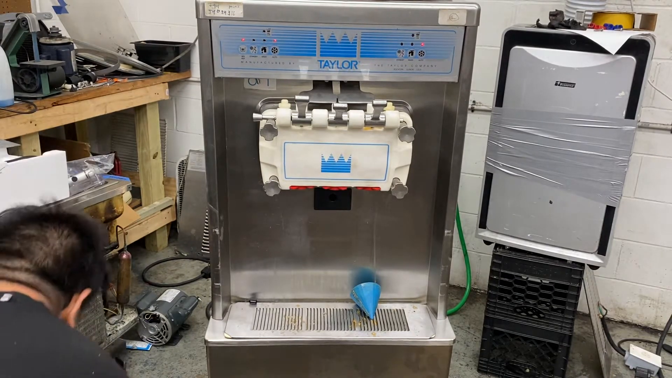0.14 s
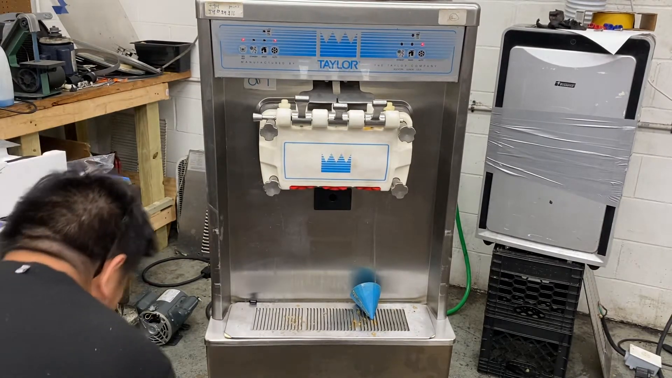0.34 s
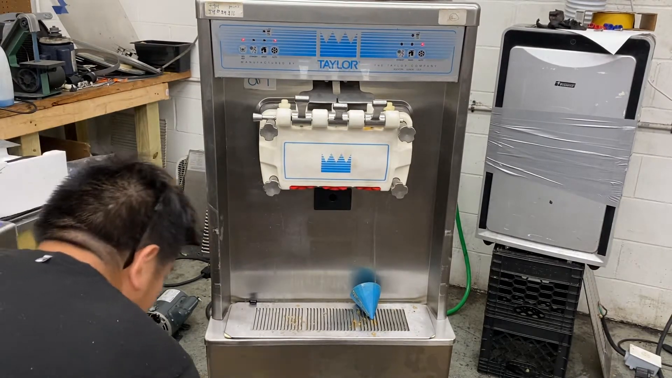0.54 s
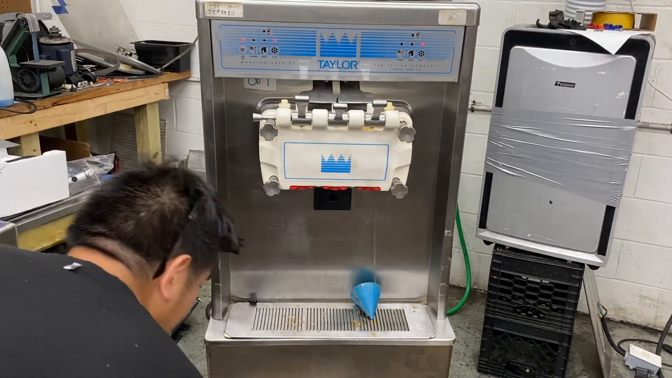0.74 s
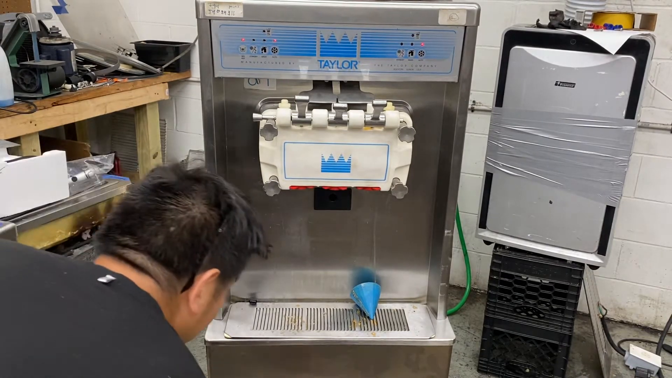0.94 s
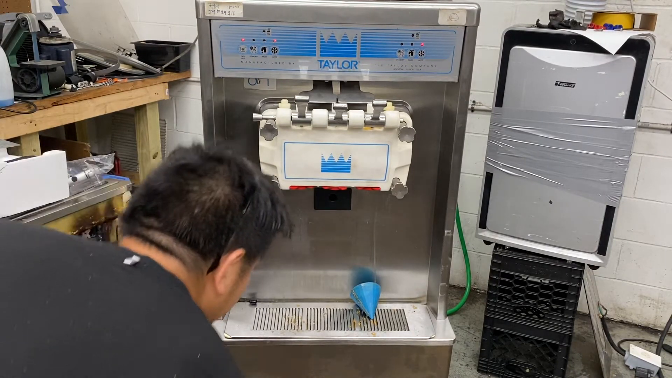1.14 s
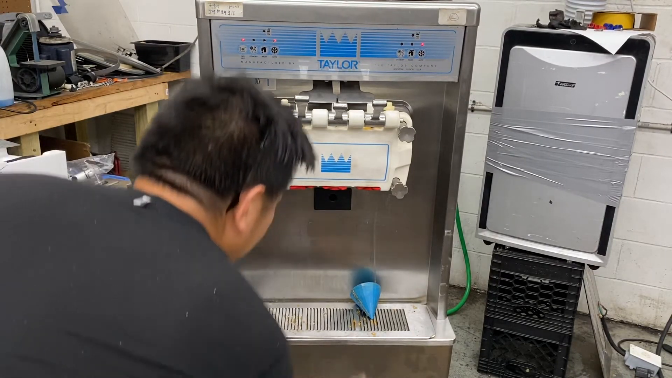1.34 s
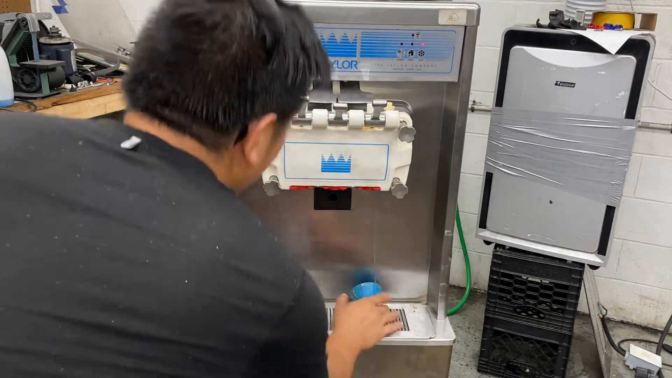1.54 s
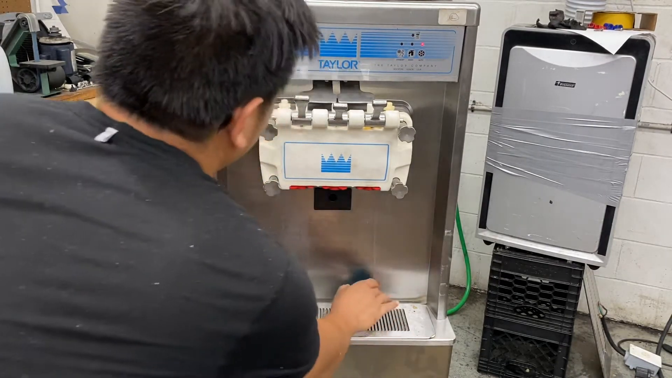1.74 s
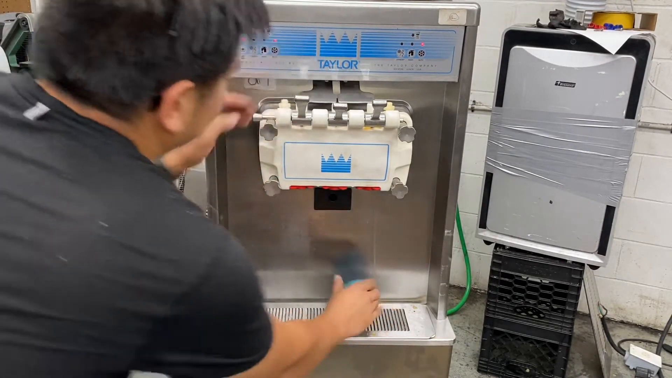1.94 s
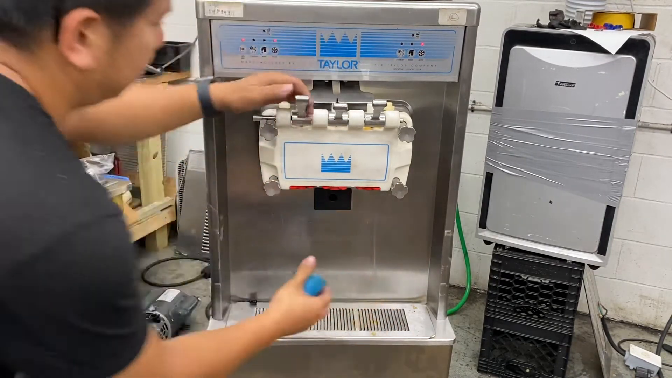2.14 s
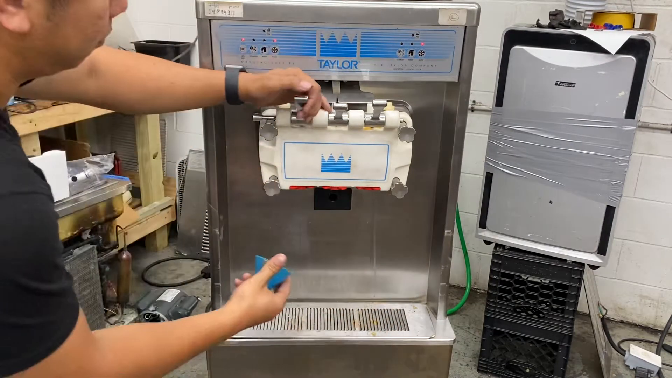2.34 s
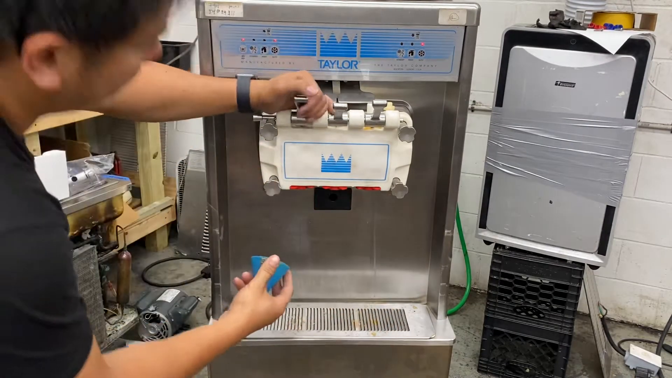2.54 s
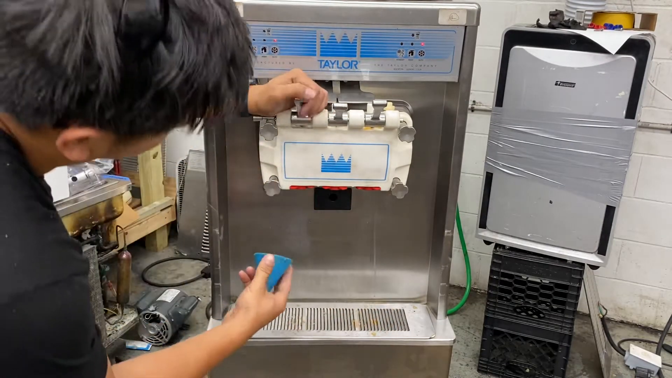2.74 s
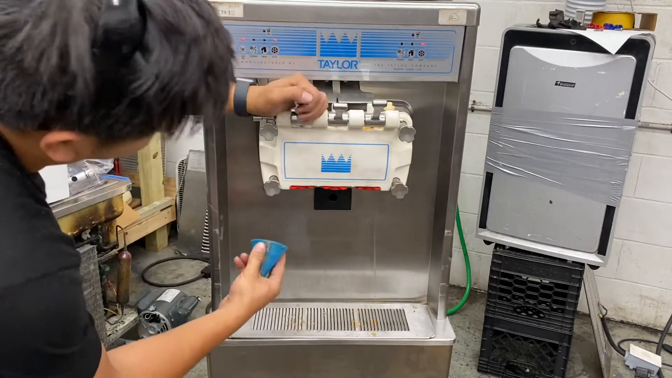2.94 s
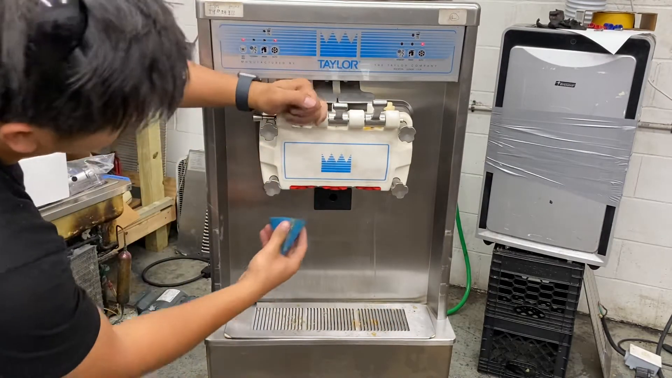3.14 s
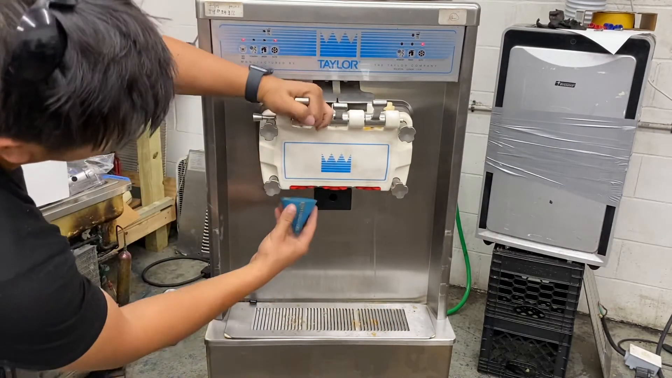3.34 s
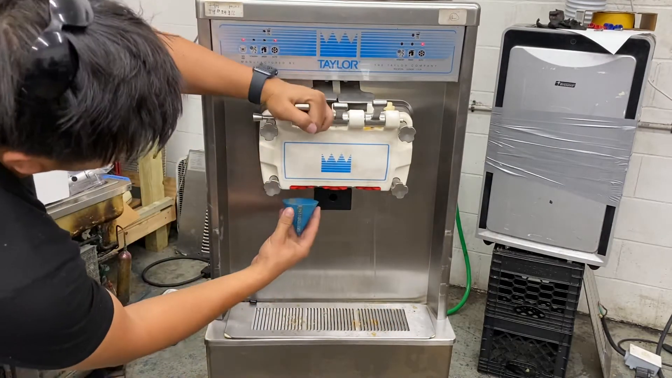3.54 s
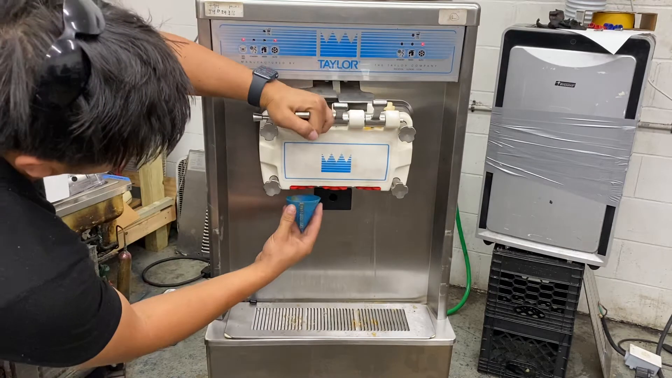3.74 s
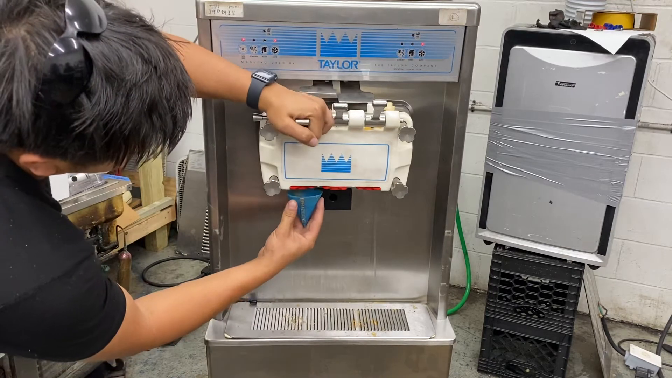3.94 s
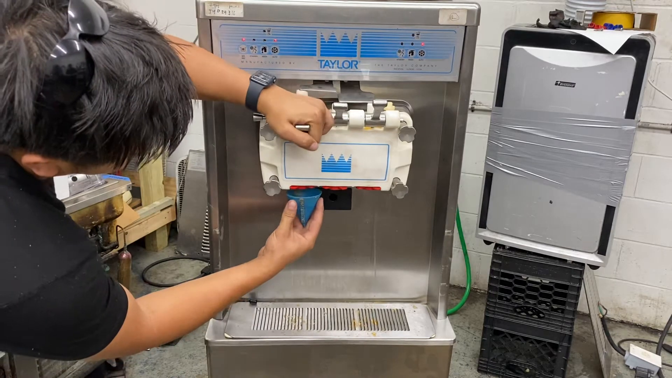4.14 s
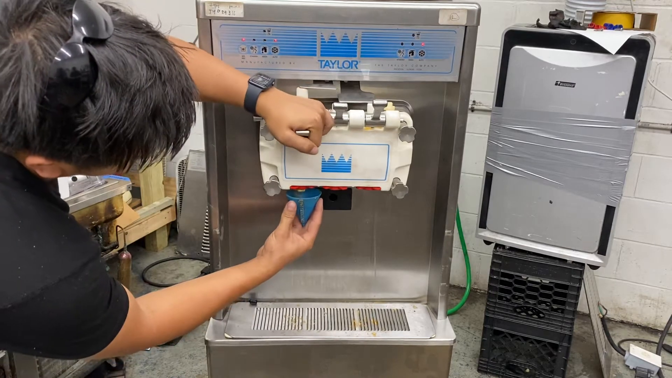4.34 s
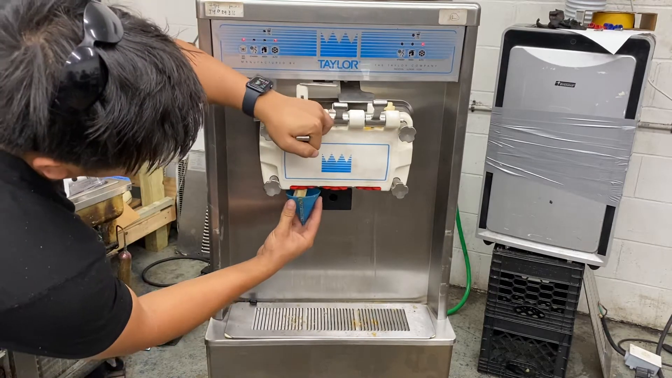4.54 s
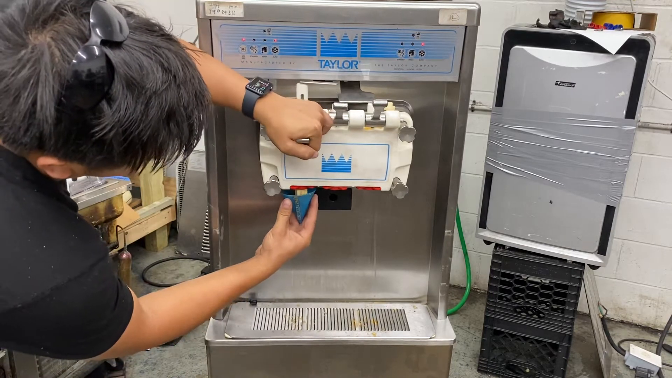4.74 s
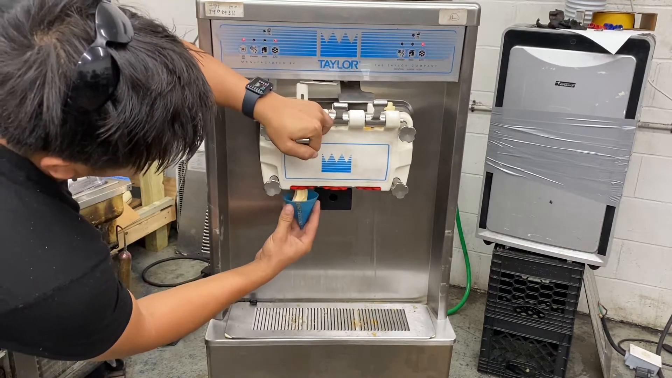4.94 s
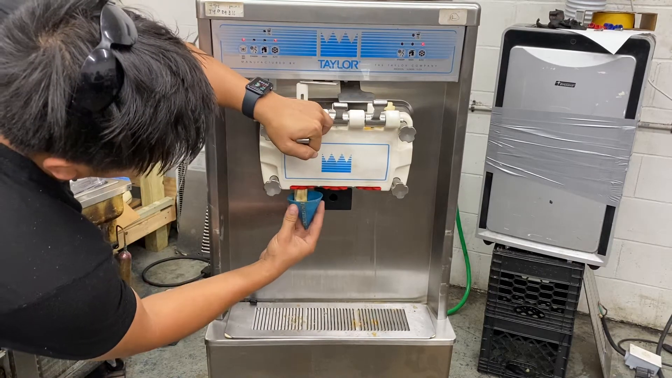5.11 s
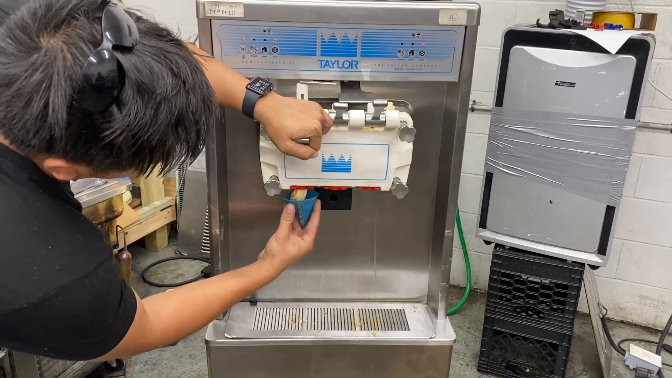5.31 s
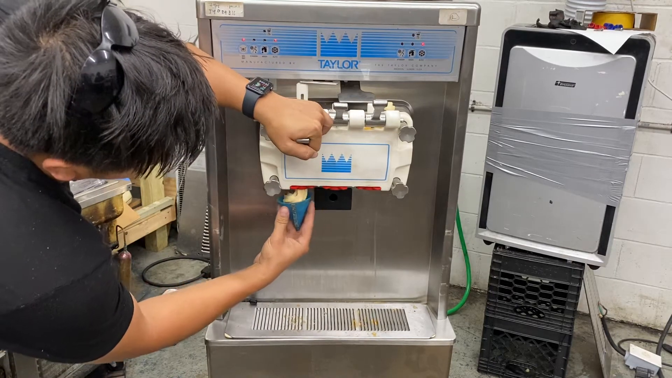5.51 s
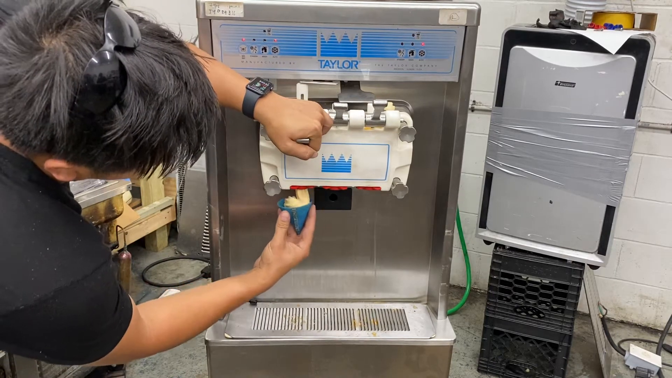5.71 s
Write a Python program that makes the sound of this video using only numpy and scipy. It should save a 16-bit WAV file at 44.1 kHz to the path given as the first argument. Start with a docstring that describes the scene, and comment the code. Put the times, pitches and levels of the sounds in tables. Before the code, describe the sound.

A quiet workshop with low, steady ventilation and a faint drone. Very soft foot bumps, a thin falling squeak and light ticks occupy the first 0.8 seconds. At 0.94 a hollow object lands with a hard, close knock; loose parts chatter and crunch until about 1.15, leaving a short boom. Around 1.7 a cup lifts faintly off a metal tray, with a sleeve rustle and tiny squeak. At 2.2 a shoe sole brushes the concrete, then bites into a brighter gritty scrape, fading by about 2.6. Near-quiet follows, with slight ticks. At 3.9 a contactor snaps, the steel cabinet jolts, and a coupling clanks and chatters until 4.2. The compressor surges up quickly, its hum fluttering and then beating slowly around 120 hertz, with shaft whine, pulsing gas noise and thin whistle. Soft gurgles and fan rush build until about 5.3, then continue to the end at roughly 6 seconds.

```python
"""Soft serve machine in a workshop

A hollow thing is knocked and rattles to rest; feet, hands and a cup stir, then a sole slides on the concrete.
The draw handle trips a contactor, the drive jolts the steel cabinet and its coupling catches with a clank.
Motors beat against the mains hum, shaft overtones whine, gas whistles and the mix gurgles in short blips,
while coloured noise swells into the condenser fan's whir. Block walls answer the blows; ventilation stays behind.
Knock and clank stand close, with more direct sound than room; small bumps sit deeper in the room than they hit."""
import sys
import numpy as np
from scipy import signal
from scipy.fft import rfft, irfft, next_fast_len
from scipy.io import wavfile
from scipy.ndimage import uniform_filter1d

SR = 44100
rng = np.random.default_rng(int(sys.argv[2]) if len(sys.argv) > 2 else 0)


def log_audio(samples):
    """Write samples as a 16-bit WAV file to the path given in sys.argv[1]."""
    # one column per channel
    frames = np.atleast_2d(samples).T
    # limit to full scale, then quantise
    limited = np.clip(frames, -1, 1)
    pcm = np.round(limited * 32767).astype(np.int16)
    wavfile.write(sys.argv[1], SR, pcm)


N = 258867
TIME = np.arange(N) / SR
START_S = 3.9  # the motors are switched on
AGE = np.maximum(TIME - START_S, 0)  # seconds since switching on

# the contactor snaps in: [t/s, level/dB, bass/dB, treble/dB]
CONTACTOR_BLOWS = [(3.895, -15, 11, 2)]
# the drive jolts the cabinet: [t/s, level/dB, bass/dB, treble/dB]
JOLT_BLOWS = [(3.958, -28, -15, 19), (3.964, -9.5, 3, 7.5), (3.977, -14, 6, -27), (4.033, -13.5, -2.5, -19),
              (4.041, -10, -1, -19), (4.057, -17, 4, -7), (4.075, -25, 5, 0)]
# the coupling grazes, catches and chatters: [t/s, level/dB, bass/dB, treble/dB]
CLANK_BLOWS = [(4.0355, -17.5, -7, -23), (4.045, -17.5, -2, -31), (4.1053, -8, -15, -2.5),
               (4.117, -17.5, -12, -1), (4.133, -29, -4, -9), (4.153, -25, 10, -13), (4.174, -26.5, 13, -4)]
# ringing modes of the steel cabinet: [f/Hz, relative level/dB, t60/s]
CABINET_MODES = [(154, -9, 0.13), (208, 5, 0.17), (226.8, 0, 0.56), (315, -12, 0.53), (364, -2.5, 0.2),
                 (489, 5.5, 0.2), (553, 4.5, 0.16), (686, 6.5, 0.15), (868, 8, 0.13), (970, -4, 0.15),
                 (1610, 6.5, 0.062), (1840, -1, 0.064), (2168, -1, 0.11), (2920, 11, 0.05),
                 (3820, -6, 0.036)]
# ringing modes of the coupling: [f/Hz, relative level/dB, t60/s]
COUPLING_MODES = [(793, -6, 0.1), (870, 5, 0.067), (955, 9, 0.081), (1030, -8, 0.046), (1516, -4, 0.089),
                  (1624, 0, 0.056), (1936, 4, 0.08), (2080, -1, 0.04), (2435, -7, 0.047),
                  (3070, 1.5, 0.027), (3530, 1, 0.034), (4400, 2, 0.03), (6500, 2, 0.043),
                  (6700, -1, 0.041), (10800, -1, 0.024)]
# steel sheets ringing on after the clank: [f/Hz, width/Hz, relative level/dB]
SHEET_RESONANCES = [(798, 29, 1.5), (877, 59, -0.5), (940, 45, -3), (1946, 70, -8.5), (6600, 410, -14.5)]
# colour of the contactor's snap: [f/Hz, relative level/dB]
SNAP_SPECTRUM = [(60, -25), (220, -0.5), (500, -5), (1000, -0.5), (1500, -6), (2600, 1.5), (3600, -8),
                 (8000, -10.5), (15000, -12)]
# colour of a blow on steel: [f/Hz, relative level/dB]
STEEL_SPECTRUM = [(50, -30), (200, 0), (450, 7.5), (950, 2), (1400, -7), (2200, -4.5), (4500, -12.5),
                  (8000, -19.5), (15000, -28)]
# colour of grating steel: [f/Hz, relative level/dB]
GRIT_SPECTRUM = [(300, -6), (850, 10), (1300, -5), (1900, -8), (3000, -2), (4500, -5), (8000, -23),
                 (15000, -38)]
GRATE_LAG_S = 0.0055  # steel grates this long after each blow

# loud lines of the compressor whine: [multiple of the shaft rate, level/dB before flutter and load]
WHINE_LINES = [(4, -43.5), (6, -41.5), (10, -46.5), (13, -51), (17, -51.5), (19, -49.5), (28, -49),
               (29, -64), (32, -51), (34, -50.5), (41, -53), (42, -54), (44, -53.5), (45, -57), (48, -52.5),
               (52, -51), (65, -60)]
# colour of the gas noise and of the faint whine lines: [f/Hz, relative level/dB]
GAS_SPECTRUM = [(25, -45), (45, -16.5), (65, -15), (120, -9), (150, -10.5), (180, -14.5), (280, -18.5),
                (400, -20), (700, -22), (1400, -31.5), (2800, -33), (5400, -42), (8000, -50.5),
                (11500, -45), (16000, -66)]
# cabinet panels droning: [f/Hz, width/Hz, relative level/dB]
PANEL_RESONANCES = [(100.7, 6.2, -42), (226.3, 8.7, -42.5)]
# motors humming a little under the mains hum and beating with it: [slip/Hz, level/dB]
MOTOR_SLIPS = [(2.097, -34.5), (4.995, -34.5)]
# compressor: full speed, speed after the first kick, time constant
SHAFT_HZ, SHAFT_KICK_HZ, SPIN_UP_S = 58.86, 40, 0.08
LOAD_S = 1.37  # fan speed and load build up over this time
GAS_DB, GAS_RISE_DB_PER_S = -37.5, 3  # gas noise grows with the pressure
SURGE_DB, SURGE_S = 9.5, 0.36  # extra effort at the start and how long it lasts
MAINS_HUM_HZ = 119.93
# the mains hum eases once the motors are up to speed: first level, change, moment
MAINS_DB, MAINS_EASE_DB, EASE_S = -31.3, -6.9, 5.147
IN_STEP_S = 5.397  # mains hum and motors swell together here
# the motors start far behind the mains hum: extra slip at switch-on and its time constant
START_SLIP_HZ, CATCH_UP_S = 26.1, 0.132
# decay of a blip, and full spread of its glide as a part of its pitch
GURGLE_T60_S, GURGLE_GLIDE_PER_S = 0.055, 3

# colour of the fan's rush: [f/Hz, relative level/dB]
FAN_SPECTRUM = [(25, -42), (50, -37), (95, -11), (120, -19), (145, -6), (184, -35), (252, -7.5), (450, -12),
                (900, -14.5), (1500, -17), (3000, -23), (7000, -31), (9500, -43), (16000, -44.5)]
# duct resonances in the fan's air: [f/Hz, width/Hz, relative level/dB]
DUCT_RESONANCES = [(254.6, 17, -10.5), (593, 45, -20)]
FAN_DB, FAN_POWER = -30.4, 1.81  # gain at full speed; the rush grows as this power of the speed
WHIR_HZ, WHIR_DB = 1171, -38.5  # blade whir at full speed
WHIR_RUN_UP_S, WHIR_POWER = 0.5, 4.1  # time constant of its climb; it grows as this power of the speed

# a hollow thing lands and rattles: [t/s, level/dB, bass/dB, treble/dB]
KNOCK_BLOWS = [(0.9352, -6, 0.5, -20), (0.941, -25, 19, -8), (0.951, -31, 5, -11),
               (0.961, -22.5, 16.5, -13), (0.969, -23, 0, -3), (0.979, -25, 5, -12), (0.995, -26, 8, -20),
               (1.016, -31, 8, 9), (1.022, -25, 5, 9), (1.0265, -16.5, 3.5, -6), (1.036, -21, 9.5, 4),
               (1.049, -24, 12, 0), (1.072, -21, 8, -22), (1.089, -22, -3, -4), (1.103, -28, 11, 3),
               (1.153, -42, 18, -10)]
# ringing modes of the hollow thing: [f/Hz, relative level/dB, t60/s]
BOX_MODES = [(163, -8.5, 0.2), (205, 4.5, 0.078), (231, -3, 0.39), (250.6, -8, 0.44), (306, -7, 0.24),
             (347, -9, 0.16), (461, -3.5, 0.06), (586, -2, 0.064), (800, -10, 0.026), (922, 5, 0.039),
             (1010, 5.5, 0.047), (1185, 6, 0.04), (1615, 14.5, 0.018), (2125, 2, 0.023), (2740, 5.5, 0.02)]
# colour of a blow on the hollow thing or the tray: [f/Hz, relative level/dB]
BOX_SPECTRUM = [(60, -35), (120, -21), (195, 4), (300, 0.5), (500, -4.5), (1000, -0.5), (1350, -4.5),
                (1650, -6), (2200, -8.5), (2700, -12), (4000, -16), (8000, -23.5), (15000, -24)]
# colour of the chattering loose parts: [f/Hz, relative level/dB]
LOOSE_SPECTRUM = [(130, -13), (230, 9), (370, 3), (600, 1), (950, 8.5), (1400, -6), (1700, -2),
                  (2500, -3.5), (3500, -16), (5500, -15), (9000, -25), (15000, -29)]

# colour of the light brush of the sole: [f/Hz, relative level/dB]
BRUSH_SPECTRUM = [(300, -6), (750, 0), (1100, 6.5), (1900, 4.5), (2400, -1), (4700, -12.5), (7000, -10.5),
                  (11000, -17), (15500, -19)]
# colour of the sole's scrape, also lent to the sleeve: [f/Hz, relative level/dB]
SOLE_SPECTRUM = [(300, -12), (550, -3), (770, 7.5), (960, -3), (1200, 5.5), (1500, 0.5), (1950, 8),
                 (2350, -2.5), (3600, -5.5), (7200, -9), (11000, -17), (15500, -21)]
BITE_S, BITE_SPAN_S = 2.255, 0.026  # the weight comes onto the sole: when and how fast
BITE_TREBLE_DB = 15  # gain in treble under the weight

# soft bumps of the feet: [t/s, level/dB, bass/dB, treble/dB]
BUMP_BLOWS = [(0.005, -42.5, 20.5, -6), (0.12, -36, 12, -10)]
# light ticks: [t/s, level/dB, bass/dB, treble/dB]
TICK_BLOWS = [(0.345, -42.5, -14, -0.5), (0.735, -45.5, -15, -2), (2.572, -46.5, -15, 7.5),
              (3.76, -46.5, 13.5, 3.5)]
# the cup is lifted off the drip tray: [t/s, level/dB, bass/dB, treble/dB]
CUP_BLOWS = [(1.722, -40.5, 4, 8.5), (1.734, -40.5, 5, 4)]
# ringing modes of the drip tray: [f/Hz, relative level/dB, t60/s]
TRAY_MODES = [(376, 5, 0.21), (570, -3, 0.085), (707, 0, 0.07), (1210, -2, 0.068)]
# thin squeaks: [t/s, f/Hz at that time, peak level/dB before the rasp, release/s]
SQUEAK_EVENTS = [(0.01, 7400, -57.5, 1), (1.69, 7050, -57, 0.25)]

# colour of the workshop's ventilation: [f/Hz, relative level/dB]
SHOP_SPECTRUM = [(25, -57), (45, -8), (76, -10), (110, -3), (157, -5.5), (195, -11.5), (250, -5.5),
                 (405, -9.5), (520, -13), (800, -12), (1130, -16.5), (3000, -31.5), (7300, -46),
                 (16000, -53.5)]
# likeness of left and right: [f/Hz, correlation]
STEREO_LIKENESS = [(60, 0.98), (130, 0.95), (300, 0.85), (700, 0.29), (1500, 0.31), (3200, 0.62),
                   (7000, 0.67), (10000, 0.018)]
TOP_HZ = 15900  # upper limit of the recorder


def start_up():
    """Contactor, cabinet and coupling are struck in turn and ring in their modes; steel grates after each blow."""
    snap = blows(CONTACTOR_BLOWS, SNAP_SPECTRUM, CABINET_MODES, rise_s=0.003, rattle_s=0.04, ring_db=-24)
    jolts = blows(JOLT_BLOWS, STEEL_SPECTRUM, CABINET_MODES, rise_s=0.0037, rattle_s=0.045, ring_db=-20)
    clanks = blows(CLANK_BLOWS, STEEL_SPECTRUM, COUPLING_MODES, rise_s=0.00091, rattle_s=0.063, ring_db=-12.5)
    force = 0
    for at_s, db, _, _ in JOLT_BLOWS + CLANK_BLOWS:
        force = force + swell(at_s + GRATE_LAG_S, db, attack_s=0.0054, release_s=0.065)
    grating = clatter(GRIT_SPECTRUM, per_s=800, spread_db=2, tick_s=0.0049) * force * undb(-17)
    sheets = resonances(SHEET_RESONANCES)
    sheets = sheets * swell(at_s=4.125, db=-30, attack_s=0.071, release_s=0.6, hold_s=0.0088)
    return pan(room(snap + jolts + clanks + grating, wet_db=-5) + sheets, db=1)


def compressor():
    """The shaft spins up and takes the load: throbbing hum, whining overtones, gas noise pulsing with the strokes."""
    shaft_hz = SHAFT_KICK_HZ + (SHAFT_HZ - SHAFT_KICK_HZ) * settle(SPIN_UP_S)
    turns = np.cumsum(shaft_hz * (1 + 0.00045 * walk(12))) / SR
    surge_db = SURGE_DB * np.exp(-(AGE / SURGE_S) ** 2)
    effort = settle(0.011) * undb(GAS_DB + GAS_RISE_DB_PER_S * AGE + surge_db)
    # the whine sinks a little as the load comes on
    whine = valves(turns) * settle(0.097) * undb(-1 - 2 * load() ** 2)
    drone = settle(0.081) * hum() + settle(0.079) * undb(-1) * resonances(PANEL_RESONANCES)
    gas = noise(GAS_SPECTRUM)
    hiss = gas - low_pass(gas, 800)
    strokes = 0.29 * np.cos(4 * np.pi * turns) + 0.18 * np.cos(2 * np.pi * turns)
    return drone + pan(whine + singing(turns), db=1.5) + effort * (gas + strokes * hiss)


def hum():
    """Two motors catch up with the mains hum: their beats slow from a flutter to a throb, in phase at IN_STEP_S."""
    eased = (1 + np.tanh((TIME - EASE_S) / 0.037)) / 2
    since = TIME - IN_STEP_S
    catching_up = START_SLIP_HZ * CATCH_UP_S * np.exp(-AGE / CATCH_UP_S)  # in cycles
    mains = undb(MAINS_DB + MAINS_EASE_DB * eased) * np.sin(2 * np.pi * MAINS_HUM_HZ * since)
    motors = 0
    for slip_hz, db in MOTOR_SLIPS:
        cycles = (MAINS_HUM_HZ - slip_hz) * since + catching_up
        motors = motors + undb(db) * np.sin(2 * np.pi * cycles)
    return np.sqrt(2) * (mains + motors)  # sine levels are rms


def valves(turns, comb_db=-40, scatter_db=2, flutter_db=3.5, wobble_turns=0.0068, count=6, size=4096):
    """The same valve chatter comes round on every shaft turn: a comb of faint lines with a few loud ones."""
    hz, db = np.transpose(GAS_SPECTRUM)
    multiples = np.arange(4, 110)
    line_db = comb_db + np.interp(np.log(multiples * SHAFT_HZ), np.log(hz), db)
    line_db = line_db + scatter_db * rng.standard_normal(len(multiples))
    for multiple, loud_db in WHINE_LINES:
        line_db[multiples == multiple] = loud_db
    # higher lines differ more between left and right
    apart = rng.standard_normal((2, len(multiples))) * np.minimum(multiples / 60, 0.6)
    phase = rng.uniform(0, 2 * np.pi, len(multiples)) + apart
    group = rng.integers(0, count, len(multiples))
    out = 0
    for k in range(count):
        # groups flutter in level and waver in phase on their own; the wavering grows with the load
        waver = wobble_turns * (0.37 + 0.6 * load() ** 2) * walk(30)
        place = ((turns + waver) * size).astype(int) % size
        lines = np.zeros((2, size // 2 + 1), complex)
        lines[:, multiples] = (group == k) * undb(line_db) * np.exp(1j * phase) * size / np.sqrt(2)
        out = out + irfft(lines)[:, place] * undb(flutter_db * walk(15))
    return out


def singing(turns, db=-38.5, from_s=5.33, order=18):
    """One overtone of the shaft swells up to from_s and dies away, warbling in phase and patchy in level."""
    warble = 1.3 * walk(40) + 0.34 * np.array([walk(27), walk(20)])
    phase = 2 * np.pi * order * turns + warble
    patches = unit(undb(4.5 * np.clip(walk(30), -2, 1.2)))
    gain = swell(from_s, db, attack_s=1.7, release_s=1.2, hold_s=0.44)
    return np.sqrt(2) * np.sin(phase) * patches * gain


def whistle(hz=5385, width_hz=110, db=-58):
    """Gas whistles thinly through a valve as the pressure builds: narrow noise that swells and slowly dies."""
    return resonances([(hz, width_hz, 0)]) * swell(at_s=4.16, db=db, attack_s=0.68, release_s=3.5, hold_s=0.41)


def gurgle(db=-39, low_hz=430, high_hz=1400, spread_db=4, count=130, size=4096):
    """The mix churns in the barrel: short soft blips of scattered pitch that grow with the load."""
    out = np.zeros((2, N + size))
    t = np.arange(size) / SR
    for when, pitch, strength, glide, side in rng.random((count, 5)):
        hz = low_hz * (high_hz / low_hz) ** pitch
        cycles = hz * t * (1 + GURGLE_GLIDE_PER_S * (glide - 0.5) * t)
        phase = 2 * np.pi * cycles + np.array([[1], [-1]]) * (side - 0.5) * 2
        blip = t * fade(t, GURGLE_T60_S) * np.sin(phase)
        start = int((START_S + when * (N / SR - START_S)) * SR)
        out[:, start:start + size] += undb(spread_db * (2 * strength - 1)) * blip
    out = out[:, :N]
    return out / np.std(out[:, TIME > START_S]) * undb(db) * load() ** 2


def fan():
    """Air churns harder through the condenser as the blades gain speed; the hiss leans left."""
    rush = churn(noise(FAN_SPECTRUM), flicker_db=1, per_s=45)
    rush = rush + resonances(DUCT_RESONANCES) * undb(0.41 * walk(11))
    low = low_pass(rush, 1500)
    return (low + pan(rush - low, db=2.5)) * undb(FAN_DB) * load() ** FAN_POWER + whir()


def churn(x, flicker_db, per_s, count=14):
    """Turbulence: overlapping bands half an octave apart each flicker on their own."""
    size = next_fast_len(N, real=True)
    place = np.clip(2 * np.log2(np.fft.rfftfreq(size, 1 / SR) / 100 + 1e-9), 0, count - 1)
    spectrum = rfft(x, size)
    out = 0
    for k in range(count):
        band = irfft(spectrum * np.maximum(1 - abs(place - k), 0), size)[:, :N]
        out = out + band * unit(undb(flicker_db * walk(per_s)))
    return out


def whir(width_hz=150):
    """A narrow band of blade noise that climbs with the fan's speed and comes out near full speed."""
    speed = settle(WHIR_RUN_UP_S)
    slow = signal.butter(2, width_hz / 2, fs=SR, output="sos")
    eddies = signal.sosfilt(slow, noise([(60, 0), (16000, 0)]) + 1j * rng.standard_normal((2, N)))
    # the slow eddies ride on the climbing blade pitch
    band = np.real(eddies * np.exp(2j * np.pi * np.cumsum(WHIR_HZ * speed) / SR))
    return unit(band) * undb(WHIR_DB) * speed ** WHIR_POWER


def knock():
    """A hollow thing bumps down, its loose parts chatter and crunch to rest and its body booms on."""
    hits = blows(KNOCK_BLOWS, BOX_SPECTRUM, BOX_MODES, rise_s=0.0021, rattle_s=0.025, ring_db=-14.5)
    shaking = swell(at_s=0.95, db=-34.5, attack_s=0.015, release_s=0.45, hold_s=0.03)
    shaking = shaking + swell(at_s=1.025, db=-32.5, attack_s=0.032, release_s=0.14, hold_s=0.015)
    loose = clatter(LOOSE_SPECTRUM, per_s=1400, spread_db=9, tick_s=0.011) * shaking
    boom = resonances([(251.6, 16, 0)])
    boom = boom * swell(at_s=1.144, db=-37, attack_s=0.27, release_s=0.37, hold_s=0.038)
    return pan(room(hits + loose, wet_db=-7), db=0.4) + boom


def slide():
    """One gritty slide of a sole: a broad light brush, then the weight comes on and the scrape grows and brightens."""
    brush = noise(BRUSH_SPECTRUM) * swell(at_s=2.15, db=-46.5, attack_s=0.29, release_s=0.4, hold_s=0.092)
    pressure = swell(at_s=2.243, db=-34.3, attack_s=0.15, release_s=0.53, hold_s=0.079)
    light = (1 - np.tanh((TIME - BITE_S) / BITE_SPAN_S)) / 2  # 1 before the weight, 0 under it
    scrape = noise(SOLE_SPECTRUM)
    low = low_pass(scrape, 2200)
    scrape = (low + (scrape - low) * undb(-BITE_TREBLE_DB * light)) * pressure
    return pan((brush + scrape) * undb(walk(150)), db=2.5)


def movements():
    """Small bumps and ticks of hands and feet, the cup leaving the tray, a sleeve, squeaks and a dull footfall."""
    bumps = blows(BUMP_BLOWS, BOX_SPECTRUM, TRAY_MODES, rise_s=0.03, rattle_s=0.19, ring_db=-18)
    cup = blows(CUP_BLOWS, BOX_SPECTRUM, TRAY_MODES, rise_s=0.0065, rattle_s=0.039, ring_db=1)
    ticks = blows(TICK_BLOWS, BOX_SPECTRUM, TRAY_MODES, rise_s=0.0005, rattle_s=0.048, ring_db=-20)
    sleeve = noise(SOLE_SPECTRUM) * swell(at_s=1.72, db=-60.5, attack_s=0.29, release_s=0.69, hold_s=0.1)
    footfall = resonances([(72, 24, 0)])
    footfall = footfall * swell(at_s=0.25, db=-45, attack_s=0.035, release_s=0.5, hold_s=0.052)
    return room(bumps + ticks, wet_db=3.5) + room(cup, wet_db=-1) + sleeve + squeaks() + footfall


def squeaks(fall_hz_per_s=1200, jitter_hz=220, attack_s=0.12):
    """Thin rasping squeaks that fall in pitch."""
    out = 0
    for at_s, hz, db, release_s in SQUEAK_EVENTS:
        rasp = np.array([walk(870), walk(650)])  # left and right roughen apart
        pitch_hz = hz - fall_hz_per_s * (TIME - at_s) + jitter_hz * walk(150)
        tone = np.sin(2 * np.pi * np.cumsum(pitch_hz) / SR)
        out = out + rasp * tone * swell(at_s, db, attack_s, release_s)
    return out


def workshop():
    """Steady ventilation, coloured noise wandering slightly in level, with a soft drone."""
    return undb(-45.5 + 0.5 * walk(5.03)) * noise(SHOP_SPECTRUM) + resonances([(241.5, 18, -52.5)])


def room(x, wet_db, low_t60=0.58, high_t60=0.64, gap_s=0.006, bass_hz=330, size=32768):
    """Block walls return a dense tail, its treble lingering a little longer; shelves and panels soak up the bass."""
    t = np.arange(size) / SR
    tail = air(size)
    low = low_pass(tail, 2000)
    tail = low * fade(t, low_t60) + (tail - low) * fade(t, high_t60)
    tail = tail * (1 - np.exp(-(t / gap_s) ** 2))  # the walls answer after a short gap
    tail = signal.lfilter(*signal.butter(2, bass_hz, "highpass", fs=SR), tail) / np.linalg.norm(tail[0])
    return x + undb(wet_db) * signal.fftconvolve(x, tail, axes=1)[:, :N]


def blows(rows, crack, modes, rise_s, rattle_s, ring_db, size=16384):
    """Each blow is a short rattling crack plus the struck thing's modes; its hardness tilts bass and treble."""
    out = np.zeros((2, N + size))
    t = np.arange(size) / SR
    colour = response(across(crack, size=1024))
    colour /= np.linalg.norm(colour)
    ring = 0
    for hz, mode_db, t60 in modes:
        # higher modes reach the two sides further out of step
        phase = rng.standard_normal((2, 1)) * min(hz / 3000, 1)
        ring = ring + undb(mode_db) * fade(t, t60) * np.sin(2 * np.pi * hz * t + phase)
    for at_s, db, bass_db, treble_db in rows:
        rattle = signal.fftconvolve(air(size) * fade(t, rattle_s), colour[None])[:, :size]
        hit = (rattle + undb(ring_db) * ring) * (1 - np.exp(-t / rise_s))
        tilt = [(280, bass_db), (800, 0), (2200, 0), (7000, treble_db)]
        hardness = response(across(tilt, size=1024))
        hit = signal.fftconvolve(hit, hardness[None])[:, :size]
        start = int(at_s * SR)
        out[:, start:start + size] += undb(db) * hit
    return out[:, :N]


def clatter(crack, per_s, spread_db, tick_s, size=1024, count=8):
    """Loose parts chatter: dense clicks of uneven strength, each part with its own tick, rms 1."""
    colour = response(across(crack, size))[None]
    out = 0
    for part in range(count):
        strength = undb(spread_db * rng.uniform(-1.1, 1, N))
        clicks = (rng.random(N) < per_s / count / SR) * strength
        tick = signal.fftconvolve(air(size) * fade(np.arange(size) / SR, tick_s), colour)
        out = out + signal.oaconvolve(clicks[None], tick)[:, :N]
    return unit(out)


def resonances(rows):
    """Noise ringing in resonances: [f/Hz, width/Hz, level/dB]."""
    push = air(next_fast_len(N, real=True))[:, :N]
    out = 0
    for hz, width_hz, db in rows:
        b, a = signal.iirpeak(hz, hz / width_hz, fs=SR)
        out = out + undb(db) * unit(signal.lfilter(b, a, signal.lfilter(b, a, push)))
    return out


def noise(spectrum):
    """Stereo noise of a given colour, rms 1."""
    size = next_fast_len(N, real=True)
    return unit(irfft(rfft(air(size)) * undb(across(spectrum, size)), size)[:, :N])


def air(size=N):
    """Stereo white noise whose left and right correlate by frequency as in STEREO_LIKENESS."""
    alike = np.clip(across(STEREO_LIKENESS, size), -1, 1)
    mid, side = rfft(rng.standard_normal((2, size)))
    mid = mid * np.sqrt((1 + alike) / 2)
    side = side * np.sqrt((1 - alike) / 2)
    return irfft(np.array([mid + side, mid - side]), size)


def settle(time_s):
    """Rise from 0 at switch-on towards 1."""
    return 1 - np.exp(-AGE / time_s)


def load():
    """Fan speed and load, 0-1: a steady run-up from switch-on."""
    return np.minimum(AGE / LOAD_S, 1)


def swell(at_s, db, attack_s, release_s, hold_s=0):
    """Gain that climbs 60 dB over the attack, holds, and falls 60 dB over the release."""
    climb = fade(np.maximum(at_s - TIME, 0), attack_s)
    fall = fade(np.maximum(TIME - at_s - hold_s, 0), release_s)
    return undb(db) * climb * fall


def fade(t, t60):
    """Exponential decay, 60 dB down after t60."""
    return np.exp(-np.log(1000) * t / t60)


def walk(rate):
    """Slow random wander, rms 1, with a new target `rate` times a second."""
    k = max(int(SR / rate), 1)
    steps = np.repeat(rng.standard_normal(N // k + 1), k)
    return unit(uniform_filter1d(uniform_filter1d(steps, k), k)[:N])


def pan(x, db):
    """Place a sound left (+) or right (-)."""
    return x * undb(np.array([[db], [-db]]) / 2)


def low_pass(x, hz):
    """Gentle first-order low-pass."""
    return signal.lfilter(*signal.butter(1, hz, fs=SR), x)


def response(db):
    """Causal (minimum-phase) impulse response with a given dB gain per frequency bin."""
    cepstrum = irfft(np.log(undb(db)))
    half = len(cepstrum) // 2
    cepstrum[1:half] *= 2
    cepstrum[half + 1:] = 0
    return irfft(np.exp(rfft(cepstrum)))


def across(points, size=N):
    """Join [f/Hz, value] points on a log axis, one value per frequency bin."""
    hz, value = np.transpose(points)
    return np.interp(np.log(np.fft.rfftfreq(size, 1 / SR) + 1), np.log(hz), value)


def undb(db):
    """Decibels to gain."""
    return 10 ** (np.asarray(db) / 20)


def unit(x):
    """Scale to rms 1."""
    return x / np.sqrt(np.mean(x ** 2))


def scene():
    """All sources together, from the machine back to the workshop."""
    machine = start_up() + compressor() + whistle() + gurgle() + fan()
    return machine + knock() + slide() + movements() + workshop()


def record(dry):
    """The recorder thins the lowest rumble and cuts the top."""
    thin = signal.sosfilt(signal.butter(2, 34, "highpass", fs=SR, output="sos"), dry)
    return signal.sosfilt(signal.ellip(8, 0.2, 70, TOP_HZ, fs=SR, output="sos"), thin)


dry = scene()
out = record(dry)
log_audio(out)
```